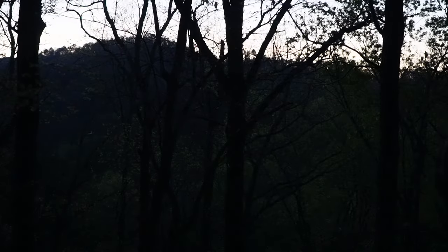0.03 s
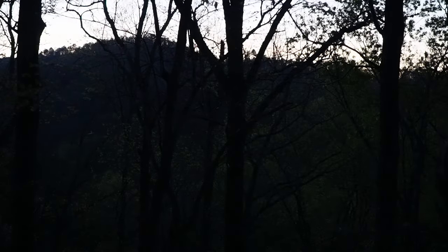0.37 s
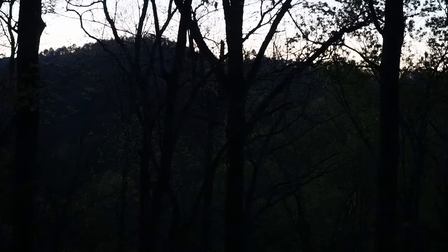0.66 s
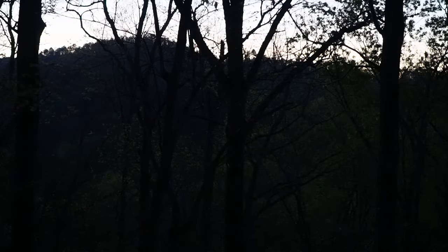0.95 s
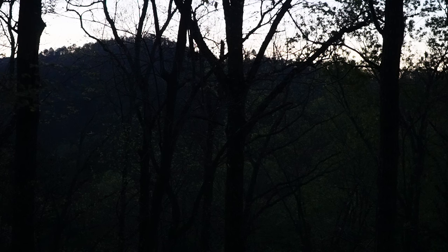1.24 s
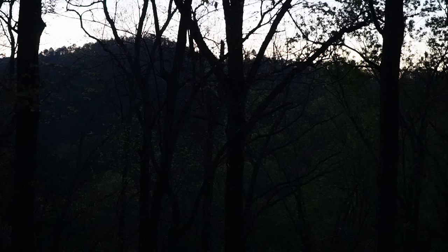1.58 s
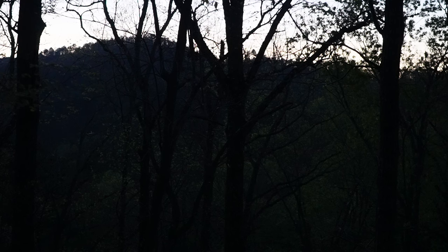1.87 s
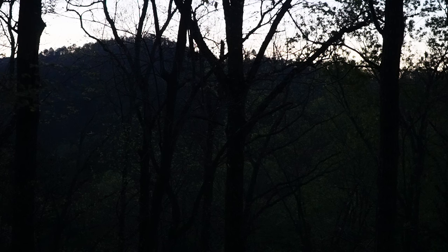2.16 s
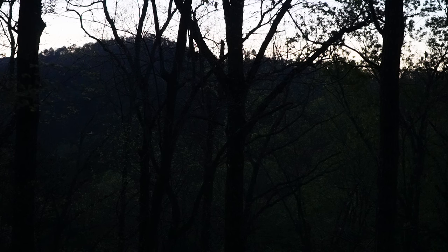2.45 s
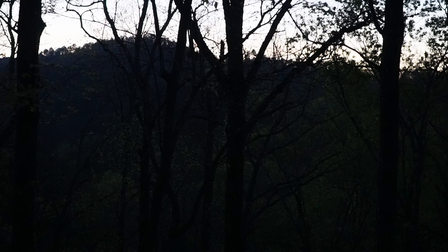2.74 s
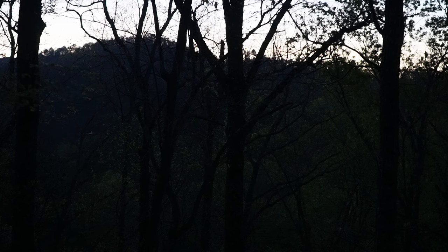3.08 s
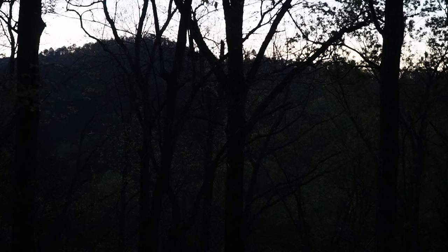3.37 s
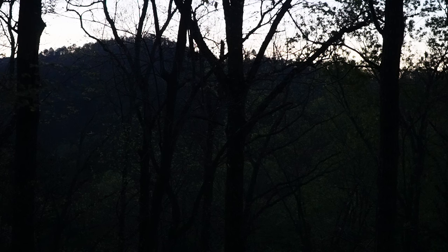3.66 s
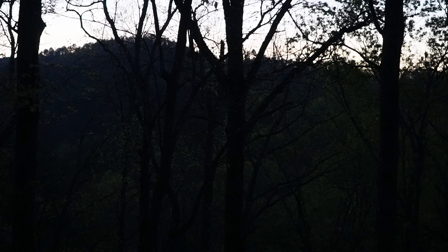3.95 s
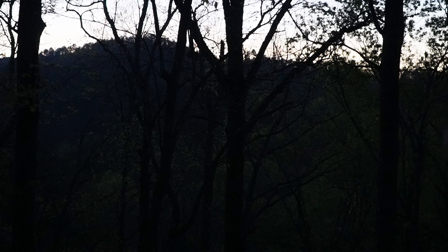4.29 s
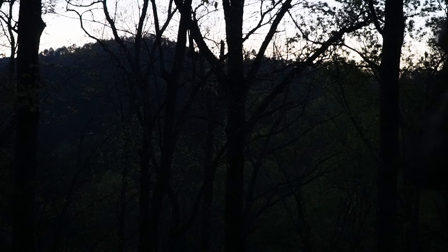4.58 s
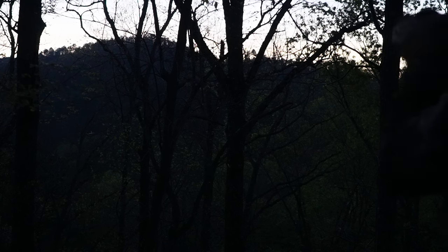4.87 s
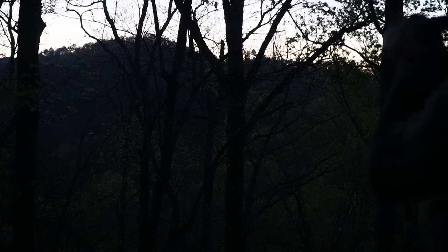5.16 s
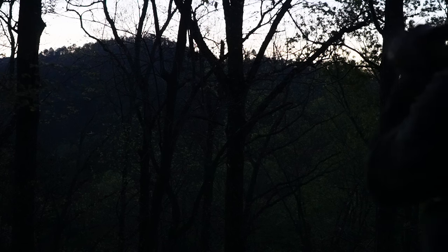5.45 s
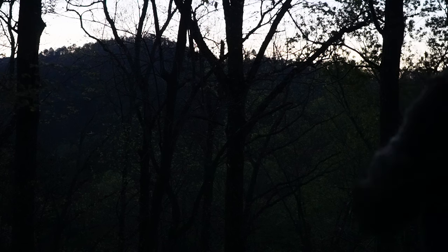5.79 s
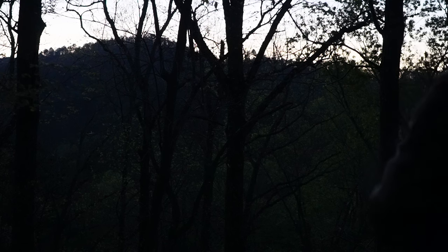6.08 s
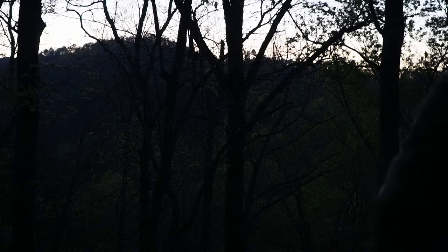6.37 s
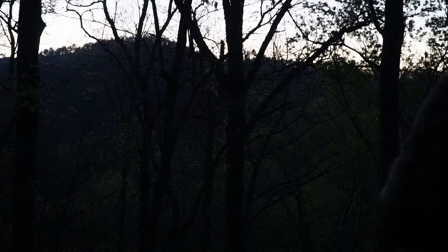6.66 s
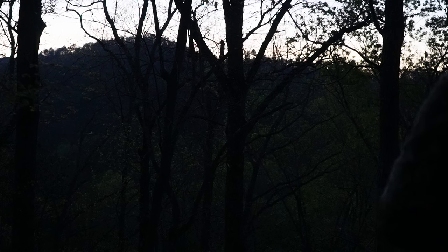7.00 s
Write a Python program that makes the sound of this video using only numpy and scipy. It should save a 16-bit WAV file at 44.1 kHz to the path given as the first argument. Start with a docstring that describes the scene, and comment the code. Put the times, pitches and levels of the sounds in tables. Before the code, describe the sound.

Still woodland at dawn, with a faint steady hiss of air. A distant whip-poor-will repeats about once a second throughout, and thin far whistles come and go. From about 0.4 to 2 seconds a songbird gives a soft, slow trill of rising notes, slightly right. At 1.9 seconds a barred owl begins hooting, loud, close and ahead: four notes until 3.1 seconds, then four more from 3.5 seconds. Each flips from a low buzz to a clear arched tone and back. The last, starting at 4.5 seconds, is held, then slides down in a wobble, ending around 5.5 seconds. Clothing rubs beside the microphone on the right, faintly near 1 and 3 seconds, more clearly with small crease ticks from 4.7 to 5.5 seconds. A fast distant trill runs from 5.1 to 6.2 seconds. The trees give the calls a short, soft echo.

```python
"""Far birds first, in still woodland at dawn: thin whistles, a whip-poor-will repeating, a slow trill.
From 1.9 s a barred owl hoots eight notes close by: harmonics through throat resonances, each note
flipping from a low buzz to a clear arch and back, the last sliding away in a wobble under a fast trill.
Trunks scatter the calls. Someone shifts beside the microphone: cloth rubs and creases tick."""
import sys
import numpy as np
from scipy import signal
from scipy.fft import rfft, irfft
from scipy.io import wavfile
from scipy.ndimage import uniform_filter1d

SR = 44100
rng = np.random.default_rng(int(sys.argv[2]) if len(sys.argv) > 2 else 0)


def generate_wav(signal):
    """Clip the signal to [-1, 1] and save it as 16-bit WAV at the path in sys.argv[1]."""
    frames = np.transpose(np.atleast_2d(signal))
    scaled = np.clip(frames, -1, 1) * 32767
    pcm = np.round(scaled).astype(np.int16)
    wavfile.write(sys.argv[1], SR, pcm)


N = 309984
TIME = np.arange(N) / SR

# owl notes (full voice [s], flip up [s], flip down [s], release [s], top pitch [Hz], climb exponent [-],
# hum [dB], low register [dB], arch [dB], arch overtone slope [dB/oct])
OWL_NOTES = [(1.89, 1.94, 2.028, 0.061, 575, 0.59, -67, -31.5, -25, -9),
             (2.283, 2.317, 2.440, 0.048, 639, .38, -50, -28, -24.5, -10),
             (2.718, 2.753, 2.816, 0.077, 619, .16, -53.5, -26.5, -20.5, -11.5),
             (2.886, 2.922, 3.074, 0.039, 640.3, .33, -54, -25.5, -23, -10.5),
             (3.541, 3.639, 3.690, .054, 578, .2, -54, -28.5, -22, -10.5),
             (3.928, 3.980, 4.082, 0.041, 625.4, .45, -47, -27.5, -23, -8),
             (4.353, 4.384, 4.477, .070, 625, .3, -51, -27.2, -23.8, -12),
             (4.539, 4.559, 5.070, 0.051, 662.4, .27, -54, -24, -22.5, -7)]
# slide of the last note (time [s], pitch [Hz], level [dB], overtone slope [dB/oct])
OWL_SLIDE = [(5.0, 660.2, -17.5, 1.5), (5.045, 639, -19, -4.5), (5.078, 600, -18, -1.5),
             (5.11, 547.6, -18.5, 1.5), (5.152, 490, -18.5, -5), (5.185, 414.4, -21, -1.5),
             (5.25, 391.5, -21, -2), (5.355, 381, -22.5, -1), (5.389, 361.6, -21.5, 0),
             (5.424, 270.1, -24.5, -4), (5.453, 203.7, -30.5, -3), (5.48, 178.6, -62, -1)]
# voice catches in the slide (time [s], dip [fraction of pitch])
OWL_CATCHES = [(5.059, .11), (5.124, .18), (5.163, .23), (5.221, .1), (5.274, 0.06926), (5.328, .07),
               (5.366, .12)]
# soft voice pure, firm voice buzzy (level [dB], overtone slope [dB/oct])
OWL_BUZZ = [(-49.5, -28), (-41, -9), (-25.5, -6.5)]
# main throat resonances (frequency [Hz], gain [dB])
THROAT_GAIN = [(170.0, -27.5), (270.0, -17.5), (400.0, -9), (510.0, 3.5), (640.0, -2), (790.0, -4),
               (950.0, -6), (1130.0, -10.5), (1320.0, -10.5), (1480.0, -26.5), (1700.0, -32.5),
               (1950.0, -29.5), (2400.0, -48)]
# faint ring above them (frequency [Hz], gain [dB])
THROAT_RING_GAIN = [(3100, -42), (3800, -35.5), (4700, -45), (6300, -55), (7600, -51), (10000, -61.5)]
# reflections off ground and nearest trunks (delay [s], gain [dB])
REFLECTIONS = [(.00335, -8), (.00794, -17), (.01571, -21)]
# owl's stereo phase: slight left lead in the bass, arbitrary left-right scatter above 2 kHz
# (frequency [Hz], left minus right [rad])
STEREO_PHASE = [(0, 0), (520, 0.25), (1980, 0.36), (2930, -5.5), (3960, -7.5), (5080, 0.5), (5510, -2),
                (6800, -1), (7750, 1.5), (8270, -1.3), (9650, 3), (11000, -1.5), (12000, 1.2), (15700, -2)]
# owl's stereo balance (frequency [Hz], left minus right [dB])
STEREO_BALANCE = [(60, 0.0), (110, 3.5), (200, -0.5), (380, 0.5), (700, 0.0), (1290, -2.0), (2380, -0.5),
                  (4400, 1), (8120, -5.5), (15000, -3.5)]
# slow-trill syllable: low hook, long upsweep (offset [s], pitch [Hz], gain [dB])
HOOKED_SWEEP = [(-.068, 2784, -7.5), (-.056, 3005, -5), (-.036, 3244, -5.5), (-.022, 3150, -23.5),
                (-.006, 3325, -7), (.003, 3535, -4), (.017, 4047, 1), (.035, 4280, -9), (.05, 5042, -5),
                (.06, 5426, -12), (.07, 5310, -49)]
# fast-trill syllable: shallow dip, upsweep (offset [s], pitch [Hz], gain [dB])
SHORT_SWEEP = [(-.045, 3845, -32), (-.032, 3680, -6), (-.014, 3550, -7.5), (0, 3473, -2.5),
               (0.012, 3900, -1.5), (.026, 4288, -4.5), (.036, 4690, -22)]
# whip-poor-will calls (time [s], level [dB])
WHIPPOORWILL_CALLS = [(-.53, -61.5), (.47, -55.5), (1.65, -54), (2.73, -54), (3.88, -52.5), (4.97, -53),
                      (6.11, -55)]
# one call: short note, low purr, whipped rise and fall (offset [s], pitch [Hz], gain [dB])
WHIPPOORWILL_SHAPE = [(-.01, 1507, -36.5), (.01, 1620, -5), (0.051, 1600, -18), (.09, 1546, -51.5),
                      (.33, 1514, -41), (0.391, 1537, -10), (.46, 1520, -12.5), (.5, 1900, 1),
                      (.54, 2507, -3.5), (.56, 2780, -3.5), (.585, 2095, -9), (0.624, 1758, -7),
                      (.65, 1700, -24.5)]
# thin far whistles (time [s], length [s], pitch [Hz], level [dB])
FAR_WHISTLES = [(0.093, 0.29, 4090, -73.5), (.47, 0.15, 6380, -80), (0.608, .45, 3490, -66),
                (3.066, .09, 6480, -72.5), (3.249, 0.35, 3600, -71), (3.912, 0.11, 3987, -68.5),
                (4.189, 0.2, 4130, -67.5), (6.722, .22, 4090, -69.5)]
# clothing shifts (time [s], hold [s], level [dB], attack [s], release [s])
CLOTH_SHIFTS = [(.95, 0.16, -63, .12, 0.14), (2.75, 0.17, -54.5, 0.12, 0.18),
                (3.58, 0.085, -60.5, .05, 0.029), (4.671, 0.75, -49.5, 0.13, 0.063),
                (4.78, 0.12, -49, .015, .25)]
# rustle spectrum (frequency [Hz], relative density [dB])
CLOTH_SPECTRUM = [(100, -24.5), (600, -7), (1500, 0.5), (2400, 2), (3800, 4), (5500, -3.5), (8000, -8),
                  (11000, -10), (13500, -12), (15500, -18)]
# loudest crease snaps (time [s], level [dB], bright part re dull [dB])
CREASE_SNAPS = [(1.07, -44, -20), (2.867, -41.5, -5), (2.9633, -43, -18), (3.3383, -44.5, -20),
                (4.7276, -35, -21.5), (4.782, -32.5, -0.5), (4.8237, -30, -25.5), (4.843, -28.5, -8),
                (5.018, -33.5, -24), (5.1182, -32, -21), (5.2493, -30.5, -19), (6.2764, -43.5, -13)]
# still-air spectrum (frequency [Hz], relative density [dB])
AIR_SPECTRUM = [(24, -69), (40, -49.5), (91, -27), (188, -23), (253, -22), (670, -11), (838, -10.5),
                (1490, -1.5), (2060, -4), (2330, -1.5), (2710, -1.5), (3060, -7.5), (4030, -8),
                (4680, -8.5), (15500, -19)]
# left-right likeness of diffuse sound (frequency [Hz], coherence [0-1])
COHERENCE = [(100, 0.93), (700, 0.82), (1500, 0.6), (3000, 0.7), (6000, .25), (14000, 0.1)]


def owl(jitter=.0023, low_jitter=.019, shimmer_db=.18, low_shimmer_db=.5, break_hz=480, breath_db=-49):
    """Syrinx harmonics glide through the throat: buzzy on the low flanks, near a sine on top."""
    pitch_hz, level_db, slope_db_oct = owl_phrase()
    slack = np.clip(2 * (1 - pitch_hz / break_hz), 0, 1)   # low register varies cycle to cycle
    waver = 1 + jitter * drift(66) + low_jitter * slack * drift(350)
    phase = 2 * np.pi * np.cumsum(pitch_hz * waver) / SR
    throat, syrinx, power = THROAT_GAIN + THROAT_RING_GAIN, 0, 0
    for k in range(1, 15):
        gain = from_db(slope_db_oct * np.log2(min(k, 5)))   # flat from harmonic 5 up
        syrinx += gain * np.sin(k * phase)
        power += (gain * from_db(at_hz(throat, k * pitch_hz))) ** 2 / 2
    loudness = from_db(level_db) * np.clip((level_db + 60) / 4, 0, 1)   # silent between hoots
    drive = loudness / np.sqrt(uniform_filter1d(power, size=300))   # evens out the throat's gain
    shimmer = from_db((shimmer_db + low_shimmer_db * slack) * drift(260))
    voice = highpass(resonate(syrinx * drive * shimmer, throat), order=3, cutoff_hz=115)
    breath = diffuse([(40, -10), (130, -5), (300, -5.5), (550, -6.5), (1250, -4), (1700, -17.5),
                      (5000, -43)])[0]
    return voice + from_db(breath_db) * breath * loudness


def owl_phrase(flip_s=.0033):
    """One voice leaps between registers, note by note: (pitch [Hz], level [dB], slope [dB/oct])."""
    voice = None
    for full_s, up_s, down_s, release_s, top_hz, bend, hum_db, low_db, arch_db, slope in OWL_NOTES:
        low = low_register(full_s, up_s, down_s, release_s, hum_db, low_db)
        high = arch(up_s, down_s, top_hz, bend, arch_db, slope)
        edges_s = [up_s - flip_s, up_s + flip_s, down_s - flip_s, down_s + flip_s]
        note = low + np.interp(TIME, edges_s, [0, 1, 1, 0]) * (high - low)
        voice = note if voice is None else np.where(note[1] > voice[1], note, voice)   # louder wins
    voice = np.where(TIME > OWL_SLIDE[0][0], slide(), voice)
    return uniform_filter1d(np.maximum(voice, -100), size=160, axis=1)   # muscles round the corners


def low_register(full_s, up_s, down_s, release_s, hum_db, low_db):
    """A hum swells and sinks; the voice opens, pushes up, lunges into the flip, later falls away."""
    hum_s, hum_sink_hz, hum_swell_db = .112, 55.15, 10
    open_hz, full_hz, pushed_hz, fall_hz, end_hz = 191, 262, 382, 358, 170.5
    opening_s, attack_s, lunge_s, lunge_hz = .012, .027, .008, 69.94
    push_db, push_db_oct, release_db = 1.5, 2.5, 33
    before_s = np.maximum(full_s - TIME, 0)
    released = np.maximum(TIME - down_s, 0) / release_s
    early = np.minimum(before_s / hum_s, 2) ** 2
    first_half = TIME < (up_s + down_s) / 2
    push = np.interp(TIME, [full_s, up_s], [0, 1]) * first_half
    rising_hz = open_hz + hum_sink_hz * early + (full_hz - open_hz) * np.exp(-before_s / opening_s)
    rising_hz += (pushed_hz - full_hz) * push + lunge_hz * np.exp(-np.abs(up_s - TIME) / lunge_s)
    falling_hz = end_hz + (fall_hz - end_hz) * np.exp(-3.3 * released)
    humming_db = np.where(before_s > 0, hum_db - hum_swell_db * early ** 2, -np.inf)
    attack_db = 12 * (before_s / attack_s) ** 1.4
    level_db = np.maximum(low_db - attack_db + push_db * push - release_db * released ** 2, humming_db)
    slope_db_oct = np.interp(level_db, *np.transpose(OWL_BUZZ)) + push_db_oct * push
    return np.array([np.where(first_half, rising_hz, falling_hz), level_db, slope_db_oct])


def arch(up_s, down_s, top_hz, bend, arch_db, slope_db_oct):
    """Clear upper register: climbs, presses louder and brighter, droops."""
    foot_hz, foot_boost_db, foot_db_oct = 506, 4, -5.5
    climb_share, droop_s, press_db_per_s, press_s = .6, .017, 16, .3
    climb = np.sin(np.pi / 2 * np.clip((TIME - up_s) / (down_s - up_s) / climb_share, 0, 1)) ** bend
    droop = np.exp(-(np.clip(down_s - TIME, 0, 10 * droop_s) / droop_s) ** 1.7)
    press_db = press_db_per_s * np.clip(TIME - up_s, 0, press_s)
    foot = np.vstack([foot_hz, arch_db + foot_boost_db, foot_db_oct])
    top = np.vstack([top_hz, arch_db, slope_db_oct])
    return foot + (top - foot) * climb * (1 - droop) + np.outer([0, 1, 1.35], press_db)


def slide(drop_s=.0055, recover_s=.012):
    """The last note falls; the voice catches, each catch dipping the pitch."""
    times_s, *columns = np.transpose(OWL_SLIDE)
    pitch_hz, level_db, slope_db_oct = [np.interp(TIME, times_s, column) for column in columns]
    dip = 0
    for catch_s, depth in OWL_CATCHES:
        away = np.maximum((catch_s - TIME) / drop_s, (TIME - catch_s) / recover_s)
        dip += depth * np.exp(-np.minimum(away, 10) ** 2)
    return [pitch_hz * (1 - dip), level_db, slope_db_oct]


def resonate(x, spectrum):
    """Minimum-phase filter: peaks ring on after they are struck."""
    size = 2 * N
    hz = np.arange(N + 1) * SR / size
    cepstrum = irfft(np.log(from_db(at_hz(spectrum, hz))), size)
    cepstrum[1:N] *= 2
    cepstrum[N + 1:] = 0
    return irfft(rfft(x, size) * np.exp(rfft(cepstrum)), size)[:N]


def reflected(x):
    """Early copies colour the sound and beat against fast glides."""
    return x + sum(from_db(db) * np.interp(TIME - delay_s, TIME, x, left=0)
                   for delay_s, db in REFLECTIONS)


def stereo_image(x):
    """Mono to stereo: left and right differ in phase and level by frequency."""
    hz = np.arange(N // 2 + 1) * SR / N
    half = from_db(at_hz(STEREO_BALANCE, hz) / 2) * np.exp(.5j * at_hz(STEREO_PHASE, hz))
    return irfft(rfft(x) * np.array([half, 1 / half]), N)


def rubbing(settled_db=-74.5, skirt_exponent=1.18):
    """Rubbing strength as a gain: each shift swells, holds, settles."""
    power = from_db(settled_db) ** 2
    for start_s, hold_s, level_db, attack_s, release_s in CLOTH_SHIFTS:
        before = np.maximum(start_s - TIME, 0) / attack_s
        after = np.maximum(TIME - start_s - hold_s, 0) / release_s
        power += (from_db(level_db) / (1 + before + after) ** skirt_exponent) ** 2
    return np.sqrt(power)


def rustle(grain_db=2, uneven_db=1.9):
    """Cloth rubs in an uneven, crackly hiss."""
    hiss = diffuse(CLOTH_SPECTRUM)
    crackle = from_db(grain_db * drift(400) + uneven_db * drift(30))
    return rubbing() * rms_one(hiss * crackle)


def creases(rate_per_s=14, small_db=-5, spread_db=2.5, bright_db=-9.5, decay_s=.0018):
    """Creases snap in dull-plus-bright bursts: a few loud, many small as the cloth rubs."""
    sizes = rubbing() * from_db(small_db + spread_db * np.clip(rng.standard_normal(N), -2, 2))
    dull = sizes * (rng.random(N) < rate_per_s / SR)
    bright = from_db(bright_db) * dull
    for start_s, level_db, treble_db in CREASE_SNAPS:
        dull[round(start_s * SR)] += from_db(level_db)
        bright[round(start_s * SR)] += from_db(level_db + treble_db)
    pole = np.exp(-1 / (decay_s * SR))
    dull, bright = signal.lfilter([1], [1, -pole], np.array([dull, bright]) + 1e-18)
    snaps = dull * diffuse([(800, -24.5), (2400, .5), (4500, -.5), (8000, -18)])
    snaps += bright * diffuse([(2500, -43), (5000, -6), (10000, 9), (15500, -2)])
    return highpass(snaps, order=2, cutoff_hz=450)


def far_birds():
    """The farther the bird, the more of it arrives scattered."""
    slow_onsets = trill(start_s=.428, period_s=.16, count=10, level_db=-47, swell_db=24)
    fast_onsets = trill(start_s=5.095, period_s=.0965, count=12, level_db=-44.5)
    slow = song(slow_onsets, HOOKED_SWEEP, waver=.018)
    fast = song(fast_onsets, SHORT_SWEEP, waver=.027)
    whippoorwill = song(WHIPPOORWILL_CALLS, WHIPPOORWILL_SHAPE, waver=.029)
    thin = whistles()
    out = pan(-5) * (from_db(-7) * slow + woods(slow, t60_s=.82, build_s=.0024, wet_db=-2.5))
    out += pan(-5.5) * (from_db(-11.5) * fast + woods(fast, t60_s=.91, build_s=.0065, wet_db=-4))
    out += pan(-1.6) * woods(whippoorwill, t60_s=1.25, build_s=.016, wet_db=2.5)
    return out + pan(-1.5) * (from_db(4.5) * thin + woods(thin, t60_s=.84, build_s=.01, wet_db=2.5))


def trill(start_s, period_s, count, level_db, swell_db=0, swell_s=.16):
    """Evenly spaced syllables, optional swell: (time [s], level [dB])."""
    t = period_s * np.arange(count)
    return np.transpose([start_s + t, level_db - swell_db * np.exp(-t / swell_s)])


def song(onsets, shape, waver, flicker_db=1):
    """One whistled glide, repeated with small changes of pitch and level."""
    out = np.zeros(N)
    offset_s, pitch_hz, shape_db = np.transpose(shape)
    wobble = 1 + waver * drift(50)
    flicker = from_db(flicker_db * drift(30))
    for start_s, level_db in onsets:
        on = (TIME > start_s + offset_s[0]) & (TIME < start_s + offset_s[-1])
        t = TIME[on] - start_s
        phase = 2 * np.pi * np.cumsum(np.interp(t, offset_s, pitch_hz) * wobble[on]) / SR
        envelope = from_db(level_db + np.interp(t, offset_s, shape_db)) * flicker[on]
        out[on] += np.sqrt(2) * envelope * np.sin(phase)
    return out


def whistles(waver=.0035):
    """Near-steady pitches that swell and fade."""
    out = np.zeros(N)
    clock_s = np.cumsum(1 + waver * drift(40)) / SR
    for start_s, length_s, pitch_hz, level_db in FAR_WHISTLES:
        swell = np.sin(np.pi * np.clip((TIME - start_s) / length_s, 0, 1))
        out += from_db(level_db) * swell * np.sin(2 * np.pi * pitch_hz * clock_s)
    return out


def woods(x, t60_s, build_s, wet_db):
    """Countless trunks scatter the sound: a tail that builds and dies."""
    t = TIME[:2 * SR]
    noise = diffuse([(100, 0), (16000, 0)])[:, :len(t)]
    tail = noise * from_db(-60 * t / t60_s) * (1 - np.exp(-t / build_s))
    tail = rms_one(tail) / np.sqrt(len(t))
    return from_db(wet_db) * signal.fftconvolve(x[None], tail, axes=1)[:, :N]


def still_air(level_db=-64):
    """Faint steady hiss from all round."""
    return from_db(level_db) * diffuse(AIR_SPECTRUM)


def diffuse(spectrum):
    """Unit-rms stereo noise from (frequency [Hz], level [dB]); sides alike in bass, apart in treble."""
    hz = np.arange(N // 2 + 1) * SR / N
    mid, side = rfft(rng.standard_normal((2, N))) * from_db(at_hz(spectrum, hz))
    alike = np.clip(at_hz(COHERENCE, hz), 0, 1)
    return rms_one(irfft(np.sqrt(1 + alike) * mid + np.sqrt(1 - alike) * side * [[1], [-1]], N))


def drift(corner_hz):
    """Smooth random wander, unit rms."""
    hz = np.arange(N // 2 + 1) * SR / N
    return rms_one(irfft(rfft(rng.standard_normal(N)) / (1 + (hz / corner_hz) ** 2), N))


def at_hz(points, hz):
    """Interpolate over log frequency."""
    points_hz, values = np.transpose(points)
    return np.interp(np.log(np.maximum(hz, 1)), np.log(points_hz), values)


def highpass(x, order, cutoff_hz):
    """Bass cut."""
    return signal.sosfilt(signal.butter(order, cutoff_hz, "high", fs=SR, output="sos"), x)


def pan(left_db):
    """Channel gains for a left-minus-right level."""
    return from_db(np.array([[left_db], [-left_db]]) / 2)


def from_db(db):
    """Decibels to gain."""
    return 10 ** (np.asarray(db) / 20)


def rms_one(x):
    """Scale to unit rms."""
    return x / np.sqrt(np.mean(x ** 2) + 1e-20)


def scene():
    """Owl near and ahead, clothing to the right, birds and still air behind."""
    voice = owl()
    near = stereo_image(reflected(voice)) + woods(voice, t60_s=.55, build_s=.0086, wet_db=-20.5)
    clothing = pan(-3.5) * rustle() + pan(-3) * creases()
    return near + clothing + far_birds() + still_air()


def record(dry, cutoff_hz=15900):
    """Steep treble cut."""
    return signal.sosfilt(signal.ellip(12, .1, 80, cutoff_hz, fs=SR, output="sos"), dry)


dry = scene()
out = record(dry)
generate_wav(out)
```